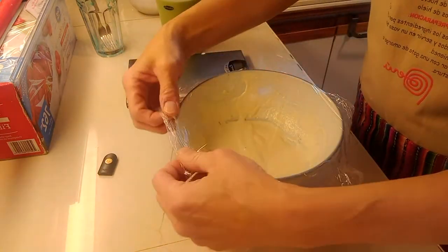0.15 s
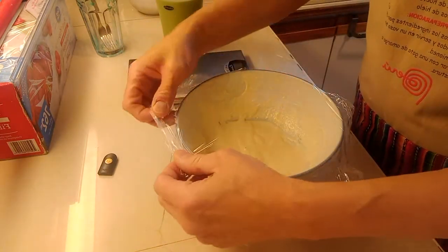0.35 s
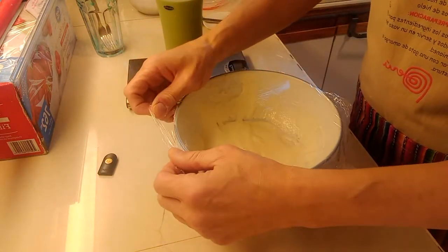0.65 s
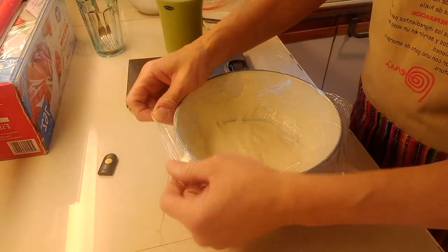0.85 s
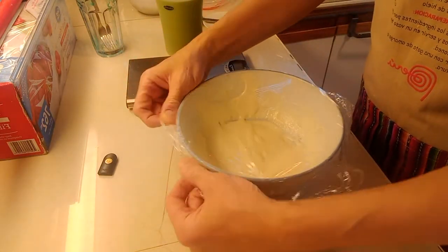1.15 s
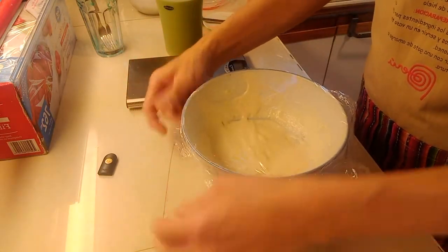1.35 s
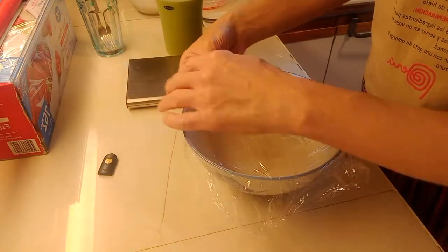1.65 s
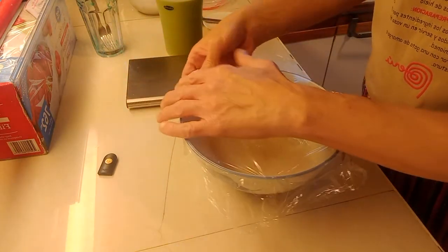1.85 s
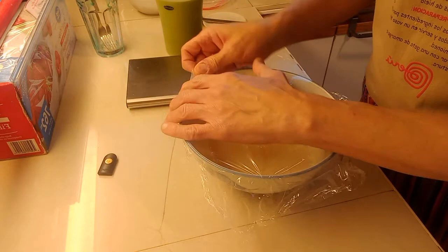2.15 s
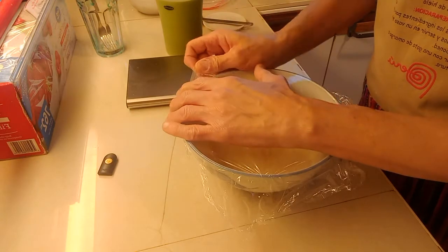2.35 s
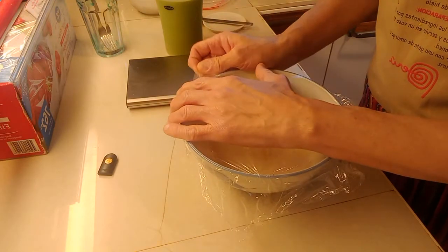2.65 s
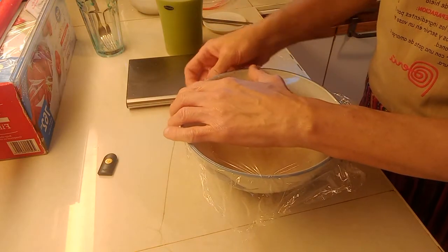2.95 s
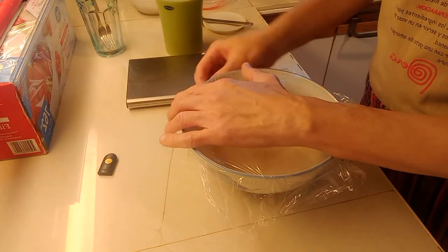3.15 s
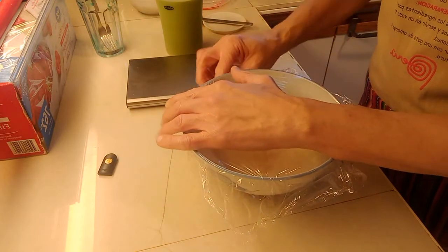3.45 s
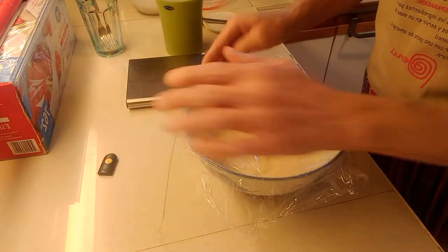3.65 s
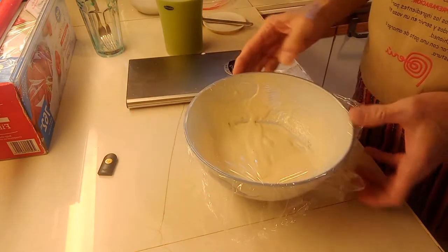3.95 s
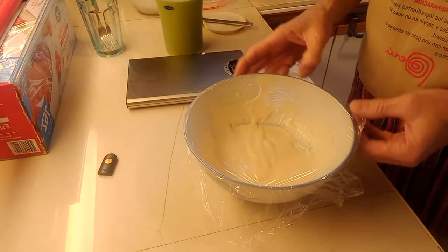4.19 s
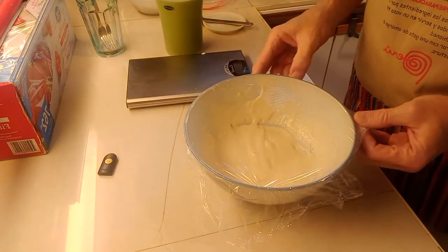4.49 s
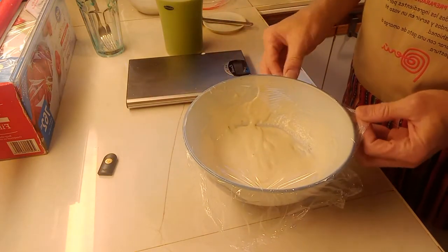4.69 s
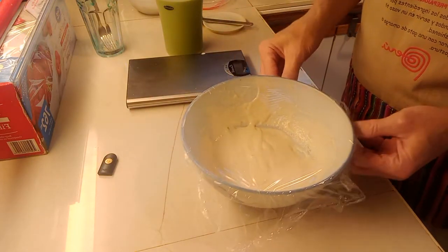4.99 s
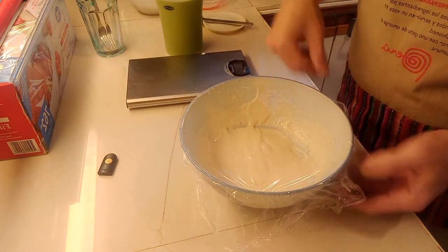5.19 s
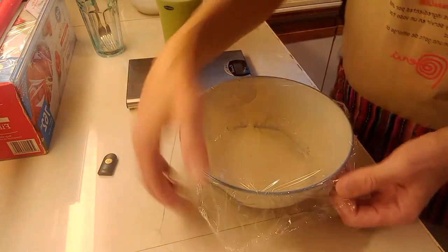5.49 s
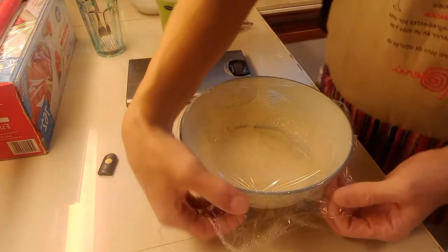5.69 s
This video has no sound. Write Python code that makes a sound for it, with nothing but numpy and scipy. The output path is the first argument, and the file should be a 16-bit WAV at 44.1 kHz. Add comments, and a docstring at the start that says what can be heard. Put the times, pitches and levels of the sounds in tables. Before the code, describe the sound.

In a small, hard-surfaced kitchen, hands tug and smooth plastic wrap around a bowl. Dry, bright crackle alternates with near quiet; stuck patches pop loose, slack film flaps softly and taut strands ping faintly. The bowl knocks twice in quick succession on the counter, followed by a dull thud. More crinkling peaks sharply, then cloth brushes gently. Close camera microphones, short room reflections, faint hiss and unsteady hum.

```python
"""Cling film crackles as it is stretched over a ceramic bowl: stick-slip grains shaped by creases and sheet.
Patches snap free in bursts of noise; the slack sheet flaps in broad bands and taut strands ping in narrow ones.
The bowl lands with a double clack and decaying modes, two dull thuds are swelling sines, and an apron rustles.
A small hard kitchen answers with decaying noise, over coloured air noise and an unsteady low hum."""
import sys
import numpy as np
from scipy import signal
from scipy.fft import rfft, irfft, next_fast_len
from scipy.io import wavfile
from scipy.ndimage import uniform_filter1d, map_coordinates

SR = 44100
rng = np.random.default_rng(int(sys.argv[2]) if len(sys.argv) > 2 else 0)


def log_audio(samples):
    """Write samples as a 16-bit WAV file to the path given in sys.argv[1]."""
    # one column per channel
    frames = np.atleast_2d(samples).T
    # limit to full scale, then quantise
    limited = np.clip(frames, -1, 1)
    pcm = np.round(limited * 32767).astype(np.int16)
    wavfile.write(sys.argv[1], SR, pcm)


N = 257103  # length in samples


def amp(db):
    """Level: decibels to amplitude ratio."""
    return 10 ** (np.asarray(db) / 20)


def unit(x):
    """Normalisation: scale to rms 1."""
    return x / np.sqrt(np.mean(x ** 2) + 1e-20)


def along(points, hz):
    """Spectral interpolation: read (f, value) points on a logarithmic frequency axis."""
    f, value = np.transpose(points)
    return np.interp(np.log(hz + 1), np.log(f + 1), value)


def curves(rows):
    """Linear interpolation in time: one value per sample for each column after t."""
    s, *columns = np.transpose(rows)
    return [np.interp(np.arange(N) / SR, s, column) for column in columns]


def wobble(rate):
    """Band-limited random modulation: a smooth curve through `rate` random knots a second."""
    knots = rng.standard_normal(int(N * rate / SR) + 4)
    return map_coordinates(knots, [np.arange(N) * rate / SR])


def add(track, s, sound):
    """Superposition: mix a sound into a track at s seconds."""
    part = track[..., max(round(s * SR), 0):][..., :sound.shape[-1]]
    part += sound[..., :part.shape[-1]]


def colour(x, spectrum):
    """Minimum-phase filtering: a causal filter of unit power gain through (f, dB) points."""
    n = x.shape[-1]
    m = 2 * next_fast_len(n // 2 + SR // 20)
    gain = amp(along(spectrum, np.fft.rfftfreq(m, 1 / SR)))
    # folding the cepstrum onto positive times makes the response causal
    cepstrum = irfft(np.log(unit(gain) + 1e-6), m)
    cepstrum[1:m // 2] *= 2
    cepstrum[m // 2 + 1:] = 0
    return irfft(rfft(x, m) * np.exp(rfft(cepstrum)), m)[..., :n]


# Correlation between the two microphones: f/Hz, likeness (1 = identical)
LIKENESS = [(150, 0.65), (400, 0.48), (1000, 0.39), (2200, 0), (12000, 0)]


def diffuse(size):
    """Diffuse-field coherence: white noise at two microphones, alike in the bass, unrelated in the treble."""
    m = next_fast_len(size, True)
    likeness = along(LIKENESS, np.fft.rfftfreq(m, 1 / SR))
    turn = np.arccos(np.clip(likeness, -1, 1)) / 2
    spectra = rfft(rng.standard_normal((2, m))) * [np.cos(turn), np.sin(turn)]
    mid, side = irfft(spectra, m)[:, :size]
    return np.array([mid + side, mid - side])


def scatter(power, t60, direct, wet_db, room_t60):
    """Energy-decay scattering: power arrives directly, via sheet and counter, and via the walls."""
    t = np.arange(SR // 3) / SR
    # decays of energy, hence 120 in place of 60
    near = amp(-120 * t / t60)
    far = amp(-120 * t / room_t60) * (1 - np.exp(-t / 0.0045))
    paths = near / near.sum() + amp(2 * wet_db) * far / far.sum()
    arriving = np.abs(signal.fftconvolve(power, paths)[:N])
    spread = np.sqrt(arriving) * diffuse(N)
    straight = direct * np.sqrt(power) * rng.choice([-1, 1], N)
    return (spread + straight) / np.hypot(1, direct)


# Relative spectrum of creasing film: f/Hz, density/dB per Hz
CREASE_SPECTRUM = [(900, -21), (2700, -9), (4100, 0), (6000, -1), (7600, 2.5), (8600, -1.5), (10200, -3),
                   (12000, 1), (16000, -1.5)]
# Relative spectrum of the taut sheet: f/Hz, density/dB per Hz
SHEET_SPECTRUM = [(90, -14.5), (175, -0.5), (260, -7.5), (380, 0), (600, 0.5), (1500, 2), (2100, -2.5),
                  (3000, -6), (6000, -9.5), (12000, -48)]


def crackle(clump_db):
    """Stick-slip friction: clumps of tiny slips, fizzing in the creases and lower in the taut sheet."""
    fine, taut = effort()
    grains = clicks(rate=5200, spread_db=4.5) * sticking(hold_db=-3.5, hold=.014)
    slips = unit(amp(clump_db * wobble(240)) * grains)
    creases = scatter((fine * slips) ** 2, t60=.005, direct=.55, wet_db=-4, room_t60=.12)
    sheet = scatter((taut * slips) ** 2, t60=0.01, direct=0.32, wet_db=-2, room_t60=0.086)
    return colour(creases, CREASE_SPECTRUM) + colour(sheet, SHEET_SPECTRUM)


def clicks(rate, spread_db):
    """Random impulse process: slips at random moments with clipped log-normal sizes, rms 1."""
    sizes = amp(spread_db * np.clip(rng.standard_normal(N), -2, 2))
    return unit((rng.random(N) < rate / SR) * sizes * rng.choice([-1, 1], N))


# Light crinkle while the fingers only hold the film: t/s, crease level/dB
HOLDING_CRINKLE = [(0, -70), (0.5, -58.5), (0.78, -75), (1.0, -51), (1.5, -60.5), (1.68, -68), (2.0, -55),
                   (2.8, -60), (3.8, -59.5), (4.2, -69), (4.7, -53.5), (5.15, -57), (5.3, -75), (5.75, -82),
                   (5.83, -60)]
# Hands pulling or smoothing the film: t/s, length/s, crease level/dB, sheet level/dB
HAND_PULLS = [(0.032, 0.19, -61.5, -68.5), (0.185, 0.21, -47, -54.5), (0.465, 0.13, -55, -58),
              (0.895, 0.2, -61, -58.5), (1.128, 0.058, -49, -63), (1.197, 0.099, -69, -62),
              (1.299, 0.13, -43.5, -53.5), (1.741, 0.24, -55, -72.5), (1.834, .13, -51.5, -60.5),
              (2.053, 0.042, -55.5, -56.5), (2.132, 0.16, -47.5, -53), (2.32, 0.15, -49.5, -56.5),
              (2.512, 0.061, -42, -48), (2.634, 0.073, -57, -63.5), (2.87, 0.075, -54.5, -66.5),
              (3.189, 0.11, -48.5, -59), (3.302, 0.054, -54.5, -64.5), (3.422, .135, -52.5, -64),
              (3.583, 0.033, -53, -70), (3.873, 0.026, -49.5, -60), (3.96, 0.075, -47, -55.5),
              (4.062, 0.09, -60.5, -93), (4.221, 0.15, -54.5, -69), (4.489, 0.15, -53.5, -65.5),
              (4.652, 0.12, -44.5, -55), (4.72, 0.065, -40.5, -44.5), (4.845, 0.15, -44.5, -63),
              (4.911, 0.081, -37, -51), (5.015, 0.077, -45, -56), (5.138, 0.055, -47, -49),
              (5.246, 0.13, -82, -67), (5.465, 0.035, -52, -80)]
HOLD_SHEET_DB = -15.5  # a held sheet is slack and sounds weaker than its creases
GRIP_S, RELEASE_S = 0.026, .12  # linear build-up time; t60 of the first fall after a pull
SETTLE_DB, SETTLE_S = -3, 0.25  # the relaxing folds soon outlast that fall: starting level, t60


def effort():
    """Addition of power: each pull builds, holds and lets go over the crinkle of the held film."""
    t = np.arange(N) / SR
    held_db, = curves(HOLDING_CRINKLE)
    power = amp([held_db, held_db + HOLD_SHEET_DB]) ** 2
    for s, length, crease_db, sheet_db in HAND_PULLS:
        after = np.maximum(t - s - length, 0)
        release = amp(-60 * after / RELEASE_S)
        settling = amp(SETTLE_DB - 60 * after / SETTLE_S)
        envelope = np.clip((t - s) / GRIP_S, 0, 1) * np.maximum(release, settling)
        power += (amp([[crease_db], [sheet_db]]) * envelope) ** 2
    return np.sqrt(power)


# Stuck patches that let go: t/s, crack level/dB, pop level/dB
PATCH_SNAPS = [(0.117, -44.5, -69), (0.215, -35, -46), (0.234, -33, -54), (0.2558, -39, -58),
               (0.2903, -34, -59), (0.307, -32.5, -51), (0.362, -32, -38), (0.4574, -41, -55),
               (0.509, -37.5, -52), (0.5581, -38.5, -39), (0.9197, -35, -42), (0.9723, -51, -42.5),
               (1.026, -36, -38), (1.2775, -39, -49), (1.3161, -34.5, -45), (1.8765, -32, -43),
               (1.956, -29.5, -42.5), (2.1184, -28, -36), (2.17, -28, -28), (2.2008, -29, -33),
               (2.2158, -27.5, -27.5), (2.225, -23.5, -27.5), (2.2357, -25, -26.5), (2.2416, -23, -24),
               (2.3429, -37, -39), (2.357, -39, -43), (2.4313, -29.5, -31), (2.5025, -38, -40),
               (2.5506, -34.5, -23), (2.7544, -38, -45.5), (2.784, -41, -64), (3.1547, -42.5, -76),
               (3.9768, -31.5, -39), (4.0287, -27, -37.5), (4.426, -41.5, -64), (4.6774, -36, -35),
               (4.7314, -17, -22), (4.756, -35, -29), (4.7905, -39, -33.5), (5.0672, -31, -36),
               (5.1693, -35, -47)]
# Relative spectrum of the popping sheet: f/Hz, density/dB per Hz
POP_SPECTRUM = [(120, -8), (350, -20), (700, 0.5), (1000, -5.5), (1500, -1), (2100, -5), (2800, -6),
                (4500, -12.5), (12000, -9)]
SNAP_T60 = 0.027  # s, how fast an avalanche of slips dies


def snaps(build):
    """Sudden release of strain: a patch lets go in an avalanche of slips and pops the stretched sheet."""
    t = np.arange(SR // 8) / SR
    avalanche = amp(-60 * t / SNAP_T60) * (1 - np.exp(-t / build))
    crack_power, pop_power = np.zeros((2, N))
    for s, crack_db, pop_db in PATCH_SNAPS:
        add(crack_power, s, (amp(crack_db) * avalanche) ** 2)
        add(pop_power, s, (amp(pop_db) * avalanche) ** 2)
    cracks = scatter(crack_power, t60=.004, direct=.4, wet_db=-4, room_t60=.14)
    pops = scatter(pop_power, t60=.005, direct=.4, wet_db=-3, room_t60=.16)
    return colour(cracks, CREASE_SPECTRUM) + colour(pops, POP_SPECTRUM)


def sticking(hold_db, hold):
    """Static friction: the film clings, so its crackle is quieter just before each patch lets go."""
    t = np.arange(SR // 20) / SR
    dip = np.zeros(N)
    for row in PATCH_SNAPS:
        add(dip, row[0] - t[-1], np.exp(-(t[::-1] / hold) ** 2))
    return amp(hold_db * np.minimum(dip, 1))


def shifting(x, depth_db):
    """Time-varying filtering: every fold has its own size, so the colour changes from moment to moment."""
    z = signal.stft(x, nperseg=256)[2]
    field = rng.standard_normal(z.shape[1:])
    for axis in (0, 1):
        field = uniform_filter1d(field, size=4, axis=axis)
    return signal.istft(z * unit(amp(depth_db * unit(field))), nperseg=256)[1][:, :N]


def counter(x, echo_db, spread):
    """Early reflection: bowl and counter throw six close echoes, up to `spread` s late, to each microphone."""
    paths = np.zeros((2, SR // 50))
    for side in paths:
        side[0] = 1
        delays = rng.uniform(spread / 10, spread, size=6)
        for delay, sign in zip(delays, rng.choice([-1, 1], size=6)):
            add(side, delay, np.array([sign * amp(echo_db)]))
    return signal.fftconvolve(x, paths / np.linalg.norm(paths[0]), axes=1)[:, :N]


# Where the hands work: t/s, left minus right treble level/dB
HAND_PLACE = [(0, 5), (1.4, 4), (2.3, 2), (3.3, 6.5), (4.4, 0.5), (5, 1), (5.8, -1)]


def placed(x, shadow_hz):
    """Acoustic shadow: the camera's body tilts the balance of the two microphones for short waves only."""
    place, = curves(HAND_PLACE)
    highpass = signal.butter(1, shadow_hz, "highpass", fs=SR, output="sos")
    treble = signal.sosfiltfilt(highpass, x)
    return x + treble * (amp(np.array([place, -place]) / 2) - 1)


# The sheet goes slack: t/s, level/dB, brightness/dB per octave
SLACK_FLAPS = [(0.179, -59.5, 0), (0.224, -52, 8.5), (0.344, -48, 5), (0.388, -56, 5), (0.458, -49, 6.5),
               (1.339, -51.5, 1), (1.368, -46, 2), (2.079, -46, 8), (2.386, -51.5, 1), (2.428, -48.5, 9.5),
               (2.554, -44.5, 10.5), (3.21, -51, 1.5), (3.894, -51, 2.5), (4.666, -50.5, 5),
               (5.078, -54.5, -3), (5.167, -45, 3.5)]
# Bands of the loose sheet's wobble, the lowest arriving last: f/Hz, width/Hz, level/dB, delay/s
SLACK_BANDS = [(710, 610, -12, 0), (422, 690, -9, 0.0016), (344, 150, -4.5, 0.00046), (178, 52, 1, 0.014)]
FLAP_S = 0.021  # twice the time the bump takes to peak


def flaps():
    """Loss of tension: the slack sheet gives a soft, rough bump whose lowest band comes last."""
    t = np.arange(SR // 6) / SR
    f = np.fft.rfftfreq(len(t), 1 / SR)
    pivot_hz = SLACK_BANDS[2][0]  # the brightness tilts about this band
    out = np.zeros((2, N))
    for s, db, tilt in SLACK_FLAPS:
        for hz, width, mode_db, delay in SLACK_BANDS:
            u = 2 * np.maximum(t - delay, 0) / FLAP_S
            swell = u * np.exp(1 - u)
            band = irfft(rfft(diffuse(len(t))) / (1 + (2 * (f - hz) / width) ** 4), len(t))
            gain = amp(db + mode_db + tilt * np.log2(hz / pivot_hz))
            add(out, s, gain * unit(band * swell) * np.sqrt(np.mean(swell ** 2)))
    return out


# Taut strands plucked by the fingers: t/s, level before level_db/dB, f/Hz
STRAND_PLUCKS = [(1.279, -40.5, 2030), (1.306, -44, 1210), (1.317, -43.5, 2050), (2.432, -34.5, 1460),
                 (2.706, -48, 1050), (2.786, -51.5, 1220)]


def plucks(level_db, t60, width_hz):
    """Damped resonance: a taut strand gives a short, rough ping of narrow-band noise."""
    t = np.arange(SR // 10) / SR
    f = np.fft.rfftfreq(len(t), 1 / SR)
    fade = amp(-60 * t / t60)
    out = np.zeros((2, N))
    for s, db, hz in STRAND_PLUCKS:
        band = irfft(rfft(diffuse(len(t))) / (1 + (2 * (f - hz) / width_hz) ** 2), len(t))
        add(out, s, amp(db + level_db) * unit(band * fade) * np.sqrt(np.mean(fade ** 2)))
    return out


# The bowl's foot lands and rocks: t/s, level before clack_db/dB
FOOT_KNOCKS = [(3.689, -16.5), (3.709, -19.5)]
# Modes of bowl and counter: f/Hz, level before ring_db/dB
BOWL_MODES = [(91.5, -48), (242.2, -51), (290.7, -46.5), (371.4, -43), (495.3, -43), (640.6, -46.5),
              (716.0, -42), (969.0, -45.5), (1104, -48), (1238, -60), (1303, -68), (1405, -55), (1583, -47),
              (1626, -68), (2213, -55), (2562, -66), (2832, -73)]
# Relative spectrum of the contact: f/Hz, density/dB per Hz
CLACK_SPECTRUM = [(50, -9), (90, -21), (150, 3), (220, -9.5), (480, -6.5), (740, 3.5), (900, -5.5),
                  (1150, -9), (1500, -13), (1800, -18), (2200, -11), (3200, -21.5), (6000, -28),
                  (14000, -32.5)]


def bowl(ring_db, clack_db, clack_t60, ring_t60, apart):
    """Modal vibration: the filled bowl lands, rings briefly between the hands, and clacks at each contact."""
    t = np.arange(SR // 2) / SR
    out = np.zeros((2, N))
    for hz, db in BOWL_MODES:
        # the hands damp the high modes soonest; ring_t60 is the low-frequency limit
        t60 = ring_t60 / (1 + hz / 3000)
        # shorter waves reach the two microphones further out of step
        phase = 2 * np.pi * (rng.random() + hz * apart * rng.standard_normal((2, 1)))
        envelope = amp(db + ring_db - 60 * t / t60) * (1 - np.exp(-t / 0.0078))
        add(out, FOOT_KNOCKS[0][0], envelope * np.sin(2 * np.pi * hz * t + phase))
    for s, db in FOOT_KNOCKS:
        burst = diffuse(len(t)) * amp(-60 * t / clack_t60)
        add(out, s, amp(db + clack_db) * colour(burst, CLACK_SPECTRUM))
    return out


# Dull thuds as weight settles on the counter: t/s, peak level/dB, f/Hz, t60/s
COUNTER_THUDS = [(3.702, -32, 87, 0.046), (4.113, -39.5, 80, 0.063)]


def thud(rise):
    """Damped oscillation: a soft, heavy sine that swells for a cycle or two, then decays."""
    t = np.arange(SR // 2) / SR
    swell = 1 - np.exp(-(2 * t / rise) ** 2)
    out = np.zeros(N)
    for s, db, hz, t60 in COUNTER_THUDS:
        fade = amp(db - 60 * np.maximum(t - rise, 0) / t60)
        add(out, s, fade * swell * np.sin(2 * np.pi * hz * t))
    return out


# Reverberation of the kitchen: f/Hz, t60/s
KITCHEN_T60 = [(100, 0.17), (500, 0.19), (2000, 0.17), (7000, 0.085), (15000, 0.088)]


def kitchen(x, wet_db, gap):
    """Reverberation: the sound plus a noise tail from counter and walls, building up over `gap` seconds."""
    hz, t, z = signal.stft(diffuse(SR // 2), SR, nperseg=256)
    decay = amp(-60 * t / along(KITCHEN_T60, hz)[:, None])
    tail = signal.istft(z * decay, SR, nperseg=256)[1]
    tail = tail * (1 - np.exp(-(np.arange(tail.shape[1]) / SR / gap) ** 2))
    tail = tail / np.linalg.norm(tail[0])
    return x + amp(wet_db) * signal.fftconvolve(np.atleast_2d(x), tail, axes=1)[:, :N]


# Apron rustle: t/s, level before level_db/dB
APRON_RUSTLE = [(5.38, -64.5), (5.435, -56.5), (5.49, -50), (5.63, -52.5), (5.77, -70), (5.83, -72)]
# Relative spectrum of the cloth: f/Hz, density/dB per Hz
CLOTH_SPECTRUM = [(59, -32), (100, -6), (241, -19), (443, -1.5), (535, -9.5), (904, -8.5), (1020, -13.5),
                  (1460, -10), (4540, -16), (15000, -26.5)]


def apron(level_db, rough_db):
    """Sliding friction: cloth rustles as coloured noise while the cook leans round the bowl."""
    level, = curves(APRON_RUSTLE)
    t = np.arange(N) / SR
    inside = (t > APRON_RUSTLE[0][0]) & (t < APRON_RUSTLE[-1][0])
    moving = uniform_filter1d(1. * inside, SR // 20)
    cloth = unit(colour(diffuse(N), CLOTH_SPECTRUM))
    return cloth * moving * amp(level + level_db + rough_db * wobble(54))


# Relative spectrum of room air and hiss: f/Hz, density/dB per Hz
AIR_SPECTRUM = [(15, -17), (25, -22), (59, 6), (97, 5.5), (236, -6.5), (384, -1), (503, -6.5), (1480, -25),
                (2760, -64), (3720, -27.5), (7310, -17.5), (9840, -23.5), (14800, -20.5), (16000, -23)]
# Appliance hum: f/Hz, level/dB
HUM_TONES = [(84, -74), (120, -77), (172, -83.5), (378, -76)]


def background(air_db, waver):
    """Stationary noise and phase modulation: room air, microphone hiss and a slightly unsteady hum."""
    t = np.arange(N) / SR
    # waver is the rms phase swing in radians at the random knots
    hum = sum(amp(db) * np.sin(2 * np.pi * hz * t + waver * wobble(8.7)) for hz, db in HUM_TONES)
    return amp(air_db) * unit(colour(diffuse(N), AIR_SPECTRUM)) + hum


def scene():
    """Superposition of film, bowl, cloth and background in the kitchen."""
    film = crackle(clump_db=1.0) + snaps(build=0.0013)
    film = counter(shifting(film, depth_db=2.4), echo_db=-17, spread=.004)
    film = placed(film, shadow_hz=6200)
    knock = bowl(ring_db=14.5, clack_db=-11.0, clack_t60=0.16, ring_t60=0.2, apart=0.00026)
    bumps = knock + flaps() + plucks(level_db=-0.5, t60=0.051, width_hz=330) + thud(rise=0.017)
    room = kitchen(bumps, wet_db=-12.0, gap=0.013)
    return film + room + apron(level_db=2, rough_db=1.0) + background(air_db=-64.5, waver=1.6)


def record(dry):
    """Band limitation: the camera cuts the deep bass and keeps nothing from 16 kHz up."""
    m = next_fast_len(N + SR // 10)
    hz = np.fft.rfftfreq(m, 1 / SR)
    low_cut = signal.butter(3, 45, "highpass", fs=SR, output="sos")
    return irfft(rfft(signal.sosfilt(low_cut, dry), m) * (hz < 16000), m)[:, :N]


dry = scene()
out = record(dry)
log_audio(out)
```